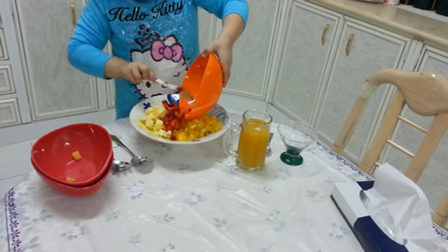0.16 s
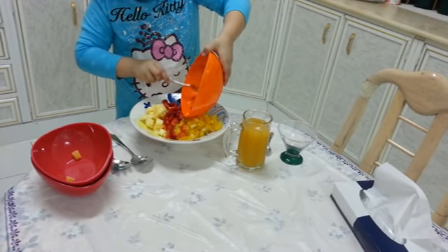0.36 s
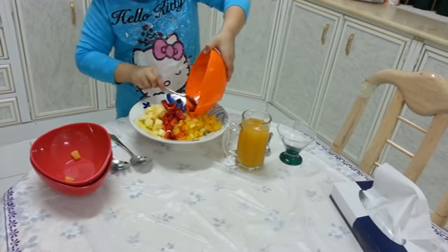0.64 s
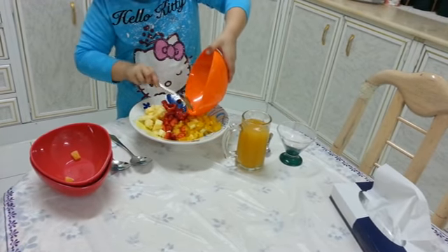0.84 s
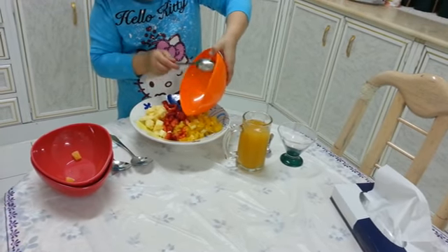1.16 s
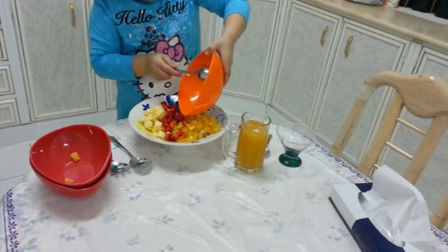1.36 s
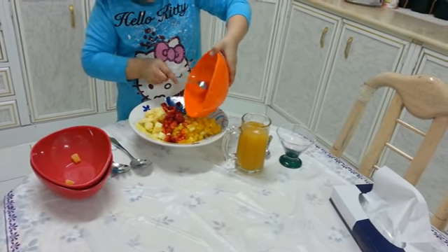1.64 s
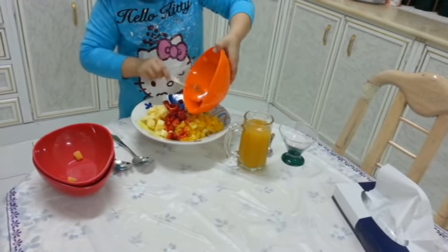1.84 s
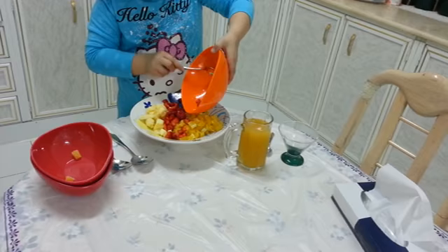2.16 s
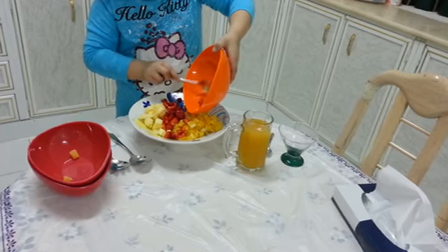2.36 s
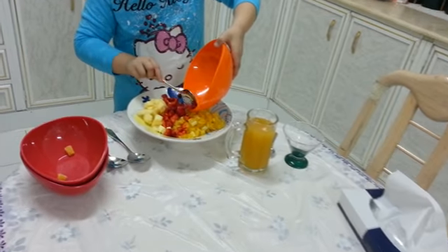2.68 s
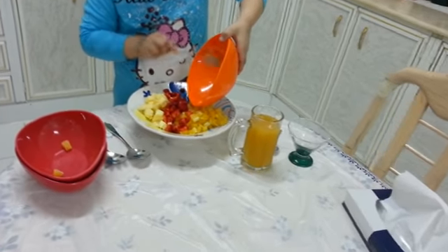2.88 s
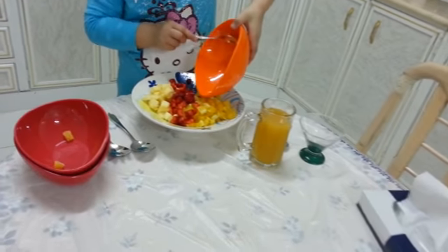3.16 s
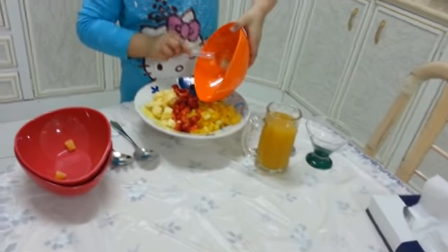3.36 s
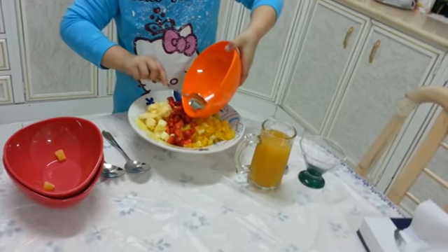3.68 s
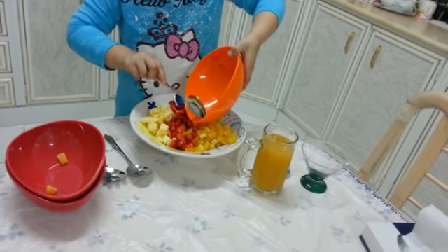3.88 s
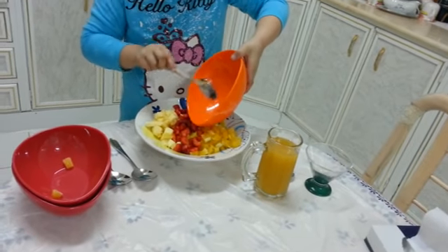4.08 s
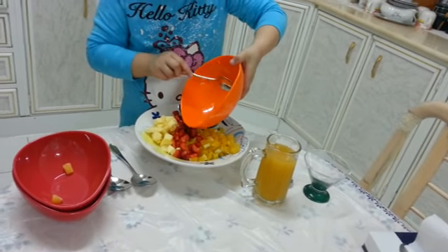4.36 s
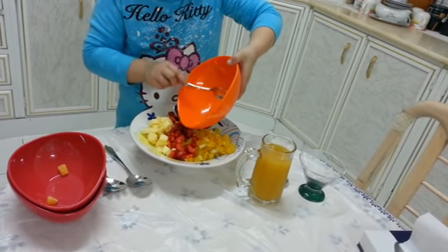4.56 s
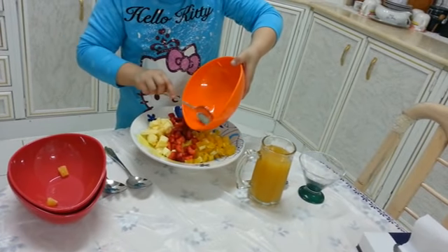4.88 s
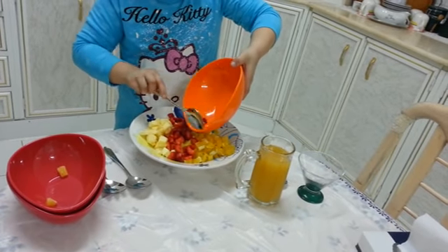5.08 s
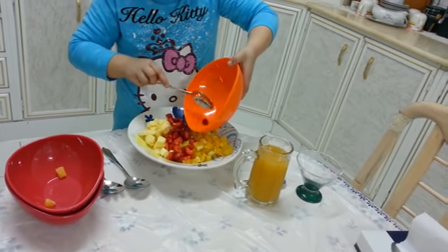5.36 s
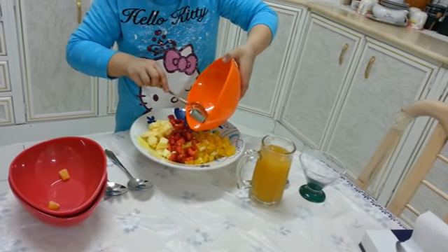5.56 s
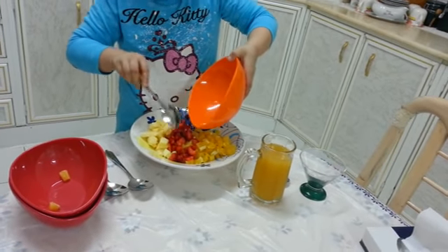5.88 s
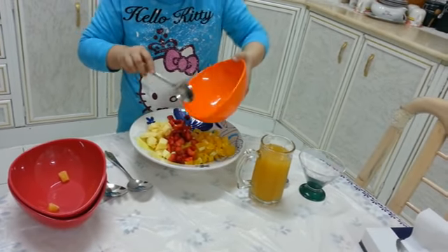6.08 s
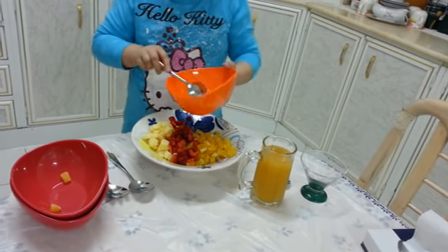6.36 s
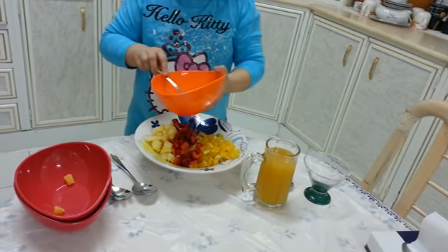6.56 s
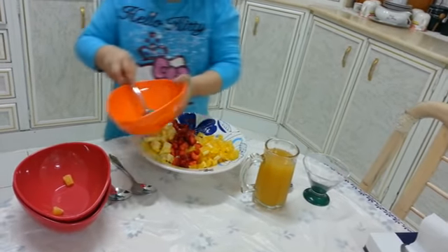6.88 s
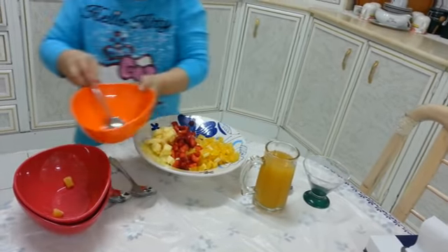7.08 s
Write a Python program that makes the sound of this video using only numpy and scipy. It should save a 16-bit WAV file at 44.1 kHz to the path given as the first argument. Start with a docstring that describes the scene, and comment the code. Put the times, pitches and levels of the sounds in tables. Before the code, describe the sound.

A metal spoon scrapes and clinks irregularly inside a small plastic bowl in a tiled kitchen, over a low steady refrigerator hum.

```python
"""A tiled kitchen: a steel spoon scrapes and knocks inside a small tilted plastic bowl, a refrigerator nearby.
The refrigerator sums compressor orders, mains buzz, panel tones and air noise under everything.
Scrapes are noisy slips with a rough squeak; knocks ring the bowl's decaying modes, then the spoon rebounds.
The tiles answer both. The right microphone port resonates in the treble, and a limiter ducks
ahead of the loudest knocks."""
import sys
import numpy as np
from scipy import signal
from scipy.fft import rfft, irfft, next_fast_len
from scipy.io import wavfile
from scipy.ndimage import uniform_filter1d, minimum_filter1d, map_coordinates

SR = 44100
rng = np.random.default_rng(int(sys.argv[2]) if len(sys.argv) > 2 else 0)


def to_wav(sig):
    """Store sig (one row per channel, or 1-D mono) as 16-bit WAV at the path in sys.argv[1].

    Samples outside -1..1 are clipped; the rate is SR.
    """
    pcm = np.clip(np.atleast_2d(sig), -1, 1) * 32767
    pcm = np.round(pcm).astype(np.int16)
    wavfile.write(sys.argv[1], SR, pcm.T)  # frames by channels


N = 318402  # samples


def amp(db):
    """Amplitude factor of a level in dB."""
    return 10 ** (np.asarray(db) / 20)


def unit(x):
    """x scaled to rms 1."""
    return x / np.sqrt(np.mean(np.abs(x) ** 2) + 1e-20)


def along(points, hz):
    """Value at hz between (f/Hz, value) points, on a log frequency axis."""
    f, value = np.transpose(points)
    return np.interp(np.log(hz + 1), np.log(f + 1), value)


def wobble(rate):
    """A smooth random curve, rate knots a second."""
    knots = rng.standard_normal(int(N * rate / SR) + 4)
    return map_coordinates(knots, [np.arange(N) * rate / SR])


def narrow(rate):
    """Complex noise of rms 1 that blurs a tone to a band about rate Hz wide."""
    return unit(wobble(rate) + 1j * wobble(rate))


def filtered(x, response):
    """x passed through a complex response of frequency."""
    m = 2 * next_fast_len(N // 2 + SR // 4)
    return irfft(rfft(x, m) * response(np.fft.rfftfreq(m, 1 / SR)), m)[..., :N]


def causal(gain):
    """Minimum-phase response with this magnitude, by folding the cepstrum."""
    cepstrum = irfft(np.log(gain))
    half = len(cepstrum) // 2
    cepstrum[1:half] *= 2
    cepstrum[half + 1:] = 0
    return np.exp(rfft(cepstrum))


# Compressor orders at the microphones, multiples 1..8 of its speed: level/dB rms
COMPRESSOR_ORDERS = [-70, -68.5, -60, -52.5, -54.5, -59.5, -64.5, -78.5]
# Rattling panels: f/Hz, level/dB rms, width/Hz
PANEL_TONES = [(196.7, -59, 3.4), (258.6, -54, 7.5), (336.3, -61.5, 11), (1150, -74.5, 9.9)]
# Spectrum shape of the room's air noise: f/Hz, relative level/dB per Hz
AIR_SHAPE = [(15, -62), (25, -5), (64, -29), (103, 0), (158, 2), (237, 5), (354, 0), (450, -7.5),
             (1030, -18.5), (5420, -26), (7680, -21), (13500, -34.5), (15000, -36)]
# Likeness of the air noise at the left and right microphones: f/Hz, correlation (1 = identical)
AIR_LIKENESS = [(25, .5), (100, 0.5), (400, 0.76), (900, 0.24), (2000, 0.021)]
COMPRESSOR_HZ = 58.54
MAINS_HZ, MAINS_DB = 120.2, -55  # dB rms
AIR_DB = -51  # dB rms


def fridge():
    """Compressor orders, mains buzz and blurred panel tones over the room's air noise."""
    t = np.arange(N) / SR
    turn = 2 * np.pi * np.cumsum(COMPRESSOR_HZ + .1 * wobble(0.692)) / SR
    hum = amp(MAINS_DB) * np.sin(2 * np.pi * MAINS_HZ * t)
    for order, db in enumerate(COMPRESSOR_ORDERS, start=1):
        level = amp(db + 1.5 * wobble(3))  # each order wavers
        hum += level * np.sin(order * turn + rng.uniform(0, 2 * np.pi))
    for hz, db, width in PANEL_TONES:
        hum += amp(db) * np.real(narrow(width) * np.exp(2j * np.pi * hz * t))

    def mid_and_side(hz):
        share = np.arccos(np.clip(along(AIR_LIKENESS, hz), -1, 1)) / 2
        return amp(along(AIR_SHAPE, hz)) * [np.cos(share), np.sin(share)]

    mid, side = filtered(rng.standard_normal((2, N)), mid_and_side)
    air = unit(np.array([mid + side, mid - side]))
    return np.sqrt(2) * hum + amp(AIR_DB) * air  # sqrt(2): sine peak to rms


# Reverberation of the tiled kitchen: f/Hz, t60/s
KITCHEN_DECAY = [(400, 0.8), (1000, 0.63), (2800, 0.66), (7400, 0.42), (13000, 0.46)]
GAP_S = .011  # time for the first walls to answer


def room(x, wet_db):
    """Direct sound plus a fresh diffuse answer of the tiles, one per ear."""
    noise = rng.standard_normal((2, 3 * SR // 4))
    hz, t, bands = signal.stft(noise, SR, nperseg=256)
    decay = amp(-60 * t / along(KITCHEN_DECAY, hz)[:, None])
    tail = signal.istft(bands * decay, SR, nperseg=256)[1]
    tail = tail * (1 - np.exp(-np.arange(tail.shape[1]) / SR / GAP_S))  # echoes build up
    tail = amp(wet_db) * tail / np.linalg.norm(tail[0])
    tail[:, 0] = 1  # direct sound
    return signal.fftconvolve(x[None], tail, axes=1)


# Modes of the bowl wall and spoon: f/Hz, relative level/dB, t60/s
BOWL_MODES = [(600, -7, .05), (750, -4, .07), (990, 0, .05), (1270, -3, .04), (1560, -3, .04),
              (1980, -4, .04), (2170, -3, .05), (2800, 0, .04), (2980, 0, .04), (3750, -5, .035),
              (4100, -5, .025), (4600, 1, .03), (4860, -2, .025), (5700, -2, .025), (6200, -1, .02),
              (6600, -1, .02), (7600, 4, .015)]


def bowl_response(f):
    """Complex response of the bowl's modes, each a damped resonator, to steady rubbing."""
    total = 0
    for centre, db, t60 in BOWL_MODES:
        width = np.log(1000) / (np.pi * t60)  # Hz, from the decay time
        total = total + amp(db) * 1j * f / (centre * centre - f * f + 1j * f * width)
    return total


# Strokes of the spoon along the wall, before room and microphones:
# start t/s, length t/s, hiss level/dB, squeak level/dB, squeak f/Hz
STROKES = [(-.08, 0.15, -44.5, -52, 2170), (0.719, 0.071, -44, -46.5, 1567), (0.788, 0.064, -38, -45, 2187),
           (1.456, 0.12, -44.5, -49, 3940), (1.528, 0.068, -50, -43, 1282), (1.581, 0.23, -44, -42, 2890),
           (2.629, 0.1, -43, -43.5, 2172), (2.838, 0.043, -46, -88, 1980), (2.919, 0.1, -45, -82, 1980),
           (3.396, 0.035, -37, -40.5, 2920), (3.82, 0.12, -43, -45, 1548), (3.879, 0.073, -35.5, -59, 1003),
           (4.268, 0.055, -46, -82, 1280), (4.588, 0.25, -46, -57.5, 1052), (4.835, 0.3, -45, -59, 1082),
           (5.057, 0.092, -37.5, -43.5, 987), (5.546, 0.089, -28, -32.5, 763),
           (5.831, 0.098, -42.5, -73, 2220), (5.977, 0.2, -42.5, -91, 4160), (6.19, 0.1, -48, -74, 1980),
           (6.34, 0.061, -44.5, -83, 1980), (6.549, 0.12, -43.5, -57, 2280), (6.72, 0.081, -39, -46, 2550),
           (6.864, 0.067, -41, -55.5, 3370)]
SQUEAK_WANDER = 0.0099  # share by which the squeak's pitch strays
RUB_DB = -8.5  # the bowl's other modes under a squeak, against it


def scraping():
    """The spoon's edge hisses over the wet wall in tiny slips and drags one wall mode into a rough squeak."""
    out = np.zeros((2, N + 3 * SR))
    slip_level = amp(0.94 * rng.standard_normal(N) + 2.7 * wobble(110))
    slips = unit(rng.standard_normal(N) * slip_level)
    hiss = unit(filtered(slips, lambda f: f / (f + 3000)))
    rub = unit(filtered(slips, lambda f: bowl_response(f) / (1 + (f / 3000) ** 2)))
    blur = unit(narrow(400) * amp(3.5 * wobble(150)))
    stray = 1 + SQUEAK_WANDER * wobble(16)
    for start, length, hiss_db, squeak_db, squeak_hz in STROKES:
        first, size = round(start * SR), round(length * SR)
        span = np.arange(first, first + size) % N
        # the squeak stutters as the edge sticks and slips, faster at higher pitch
        stutter = blur[(span * squeak_hz / 4200).astype(int)]
        phase = 2 * np.pi * np.cumsum(squeak_hz * stray[span]) / SR
        squeak = np.real(stutter * np.exp(1j * phase))
        drag = amp(squeak_db) * (squeak + amp(RUB_DB) * rub[span])
        press = np.sin(np.linspace(0, np.pi, size)) ** 0.69
        sound = room(press * (amp(hiss_db) * hiss[span] + drag), wet_db=-9.0)
        out[:, SR + first:][:, :sound.shape[1]] += sound  # 1 s of margin for a stroke already under way
    return out[:, SR:SR + N]


BODY_HZ, TREBLE_HZ, EDGE_HZ = 1600, 7500, 13000  # body below the first, treble at the second, edge at the last
EDGE_DB = -11.5  # level at the top edge, against treble
RING_OCTAVES = 0.13  # width of the lift around the strongest ring
PARTNER_HZ, PARTNER_SHARE = 4600, 0.36  # a higher ring that comes with it, and its share of the lift


def struck_colour(hz, body_db, ring_hz, lift_db):
    """Relative dB of the wall's modes: a body-to-treble shelf, plus this contact's lift at two rings."""
    shelf = along([(BODY_HZ, body_db), (TREBLE_HZ, 0), (EDGE_HZ, EDGE_DB)], hz)

    def near(centre_hz):
        return np.exp(-.5 * (np.log2(hz / centre_hz) / RING_OCTAVES) ** 2)

    return shelf + lift_db * (near(ring_hz) + PARTNER_SHARE * near(PARTNER_HZ))


# Spoon contacts, before room and microphones: t/s, treble level/dB, body against treble level/dB,
# strongest ring f/Hz, its lift level/dB, first rebound against the blow level/dB
KNOCKS = [(0.6129, -20.5, -9.5, 2820, 6, -10.5), (1.3596, -19.5, -10, 622, 12, -9.5),
          (1.634, -40, -7, 2850, 10, -5), (1.676, -38.5, 4, 2890, 14, -15), (1.7, -49, -5, 2900, 25, -14),
          (1.7512, -27, -6.5, 1820, 14, -24), (1.7552, -30.5, -6.5, 3740, 14.5, -9),
          (2.177, -15.5, -6, 2700, 17.5, -5), (2.383, -32.5, -30, 6800, 3, -17),
          (2.4405, -14, -14, 960, 6.5, -20), (2.4502, -18.5, -14.5, 900, 10, -22),
          (2.4595, -22, -6, 660, 6, -25), (2.4661, -8.5, -16.5, 900, 0, -7.5),
          (2.616, -29.5, -10, 2200, -5, -18), (3.0706, -12, -24, 2810, -2.5, 2.5),
          (3.0934, -19.5, -10, 1750, 2, -5), (3.256, -26.5, -11, 2780, 8, -12),
          (3.39, -31.5, -20, 2880, 5, -5), (3.4355, -27, -11.5, 2830, 24.5, -11),
          (3.449, -24, -17, 4400, 8, -3), (3.5163, -11, -17.5, 2500, 3.5, 2),
          (3.672, -27, -22, 1170, 20, -12), (3.8392, -43, -6.5, 1570, 19, -2),
          (4.4243, -10, -17, 960, 3.5, -3), (4.452, -30.5, -10.5, 660, 12.5, 1.5),
          (4.7348, -39, -18.5, 980, 7, 0), (4.971, -31.5, -61, 1960, 3, -7),
          (5.0455, -21.5, -11.5, 2010, 11, -11), (5.5186, -3.5, -19, 910, 8, -25),
          (5.537, -8.5, -22, 740, 12, -7.5), (5.561, -19.5, -19, 754, 5, 11),
          (6.204, -43.5, -39, 990, 4, -8), (6.3965, -15, -10.5, 1630, 8.5, -27),
          (6.4306, -39.5, -8.5, 4490, 22.5, -10), (6.67, -27, -9, 2170, 13, -11),
          (6.7734, -35, -5, 2230, 5, -11), (6.780, -20.5, -8, 2450, 15, -6.5),
          (6.8998, -30.5, -9, 2400, -10, -11), (6.9049, -26.5, -19, 2300, 0, -6),
          (7.0492, -20, -10.5, 2090, 9.5, -4), (7.057, -18.5, -16, 2740, 18.5, -7)]
GRAZE_S = 0.00092  # decay time: each rebound is a brief gritty slide
CHATTER_S, CHATTER_LOSS_DB = .0052, 2.5  # mean time between touches on the wall, loss per touch


def knocks():
    """Each contact rings the bowl's modes at new strengths under a short crack, then the spoon chatters."""
    out, t = np.zeros((2, N + 2 * SR)), np.arange(SR // 6) / SR
    mode_hz, mode_db, t60 = np.transpose(BOWL_MODES)
    graze = np.exp(-t[:SR // 200] / GRAZE_S)
    graze = graze / np.linalg.norm(graze)
    for s, db, *colour, rebound_db in KNOCKS:
        hz = mode_hz * rng.normal(1, 0.0056, len(mode_hz))  # the grip detunes the bowl
        level = mode_db - 10.5 + struck_colour(hz, *colour) + rng.normal(0, 1.5, len(hz))
        decay = amp(level[:, None] - 60 * t / t60[:, None])
        ring = (decay * np.sin(2 * np.pi * hz[:, None] * t)).sum(axis=0)

        # the crack: dense, heavily damped wall modes
        hz, short = rng.normal(np.linspace(400, 14000, num=240), 13.5)[:, None], t[:SR // 20]
        phase = 2 * np.pi * rng.random(hz.shape)
        decay = amp(struck_colour(hz, *colour) - 9.5 - 60 * short / 0.021)
        ring[:len(short)] += (decay * np.sin(2 * np.pi * hz * short + phase)).sum(axis=0)

        touches = np.zeros(SR // 25)
        later = np.cumsum(CHATTER_S * SR * rng.uniform(.8, 1.2, size=4)).astype(int)
        loss_db = CHATTER_LOSS_DB * np.arange(len(later))
        touches[later] = amp(rebound_db - loss_db + rng.normal(0, 0.64, len(later)))
        slide = np.convolve(touches, graze)[:len(touches)]
        grit = rng.standard_normal(len(touches)) * slide  # no two rebounds alike
        grit[0] = 1  # the blow itself is clean
        onset = 1 - np.exp(-t / 0.0011)
        blow = signal.fftconvolve(ring * onset, grit)
        sound = room(amp(db) * blow, wet_db=-2.5)
        out[:, round(s * SR):][:, :sound.shape[1]] += sound
    return out[:, :N]


# Colour of the path from the small bowl through each microphone port,
# with bass strong at left and weak at right: f/Hz, level/dB
LEFT_PORT_COLOUR = [(250, 8.5), (550, 4.5), (2900, -3.5), (3400, -10.5), (3900, 2), (4800, -1.5),
                    (6500, -0.5), (7600, -7), (9000, -15), (11000, -13.5), (13500, -25)]
RIGHT_PORT_COLOUR = [(250, -19), (550, 4), (2900, -1.5), (3400, -1.5), (3900, -2), (5200, -6), (6900, 2),
                     (7650, 9.5), (8350, 2.5), (11000, -10), (13500, -26)]


def microphone_ports(hz):
    """Minimum-phase response from the bowl through the left and right ports."""
    return [causal(amp(along(port, hz))) for port in (LEFT_PORT_COLOUR, RIGHT_PORT_COLOUR)]


def scene():
    """The bowl heard through the two ports, over the refrigerator and air as they stand at the microphones."""
    background = fridge()
    return background + filtered(scraping() + knocks(), microphone_ports)


TOP_HZ = 15350  # upper band limit


def record(dry):
    """A look-ahead limiter ramps down before peaks, holds and recovers; then the band limit."""
    ahead, hold = SR // 50, int(0.014 * SR)  # samples
    ceiling, firmness = .75, .88  # peak amplitude, share of the excess dB taken off
    peak = np.abs(dry).max(axis=0)  # both channels duck together
    need_db = -firmness * 20 * np.log10(np.maximum(peak / ceiling, 1))
    held_db = minimum_filter1d(need_db, size=ahead + hold, origin=(hold - ahead) // 2)
    gain_db = np.roll(uniform_filter1d(held_db, size=ahead), ahead // 2)
    return np.clip(filtered(dry * amp(gain_db), lambda hz: hz < TOP_HZ), -1, 1)


dry = scene()
out = record(dry)
to_wav(out)
```